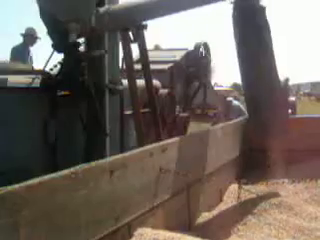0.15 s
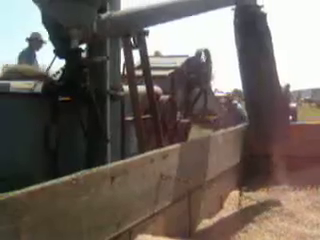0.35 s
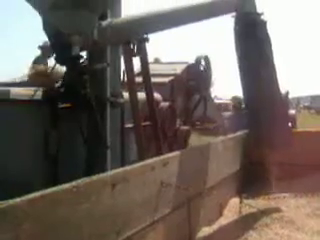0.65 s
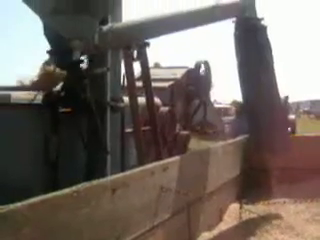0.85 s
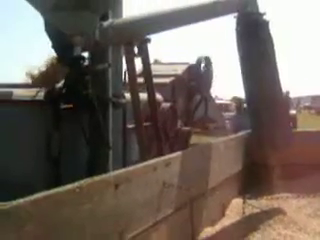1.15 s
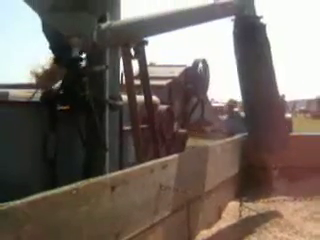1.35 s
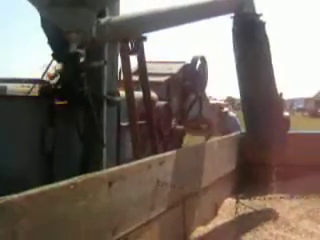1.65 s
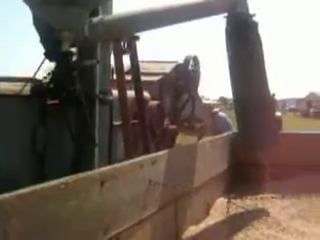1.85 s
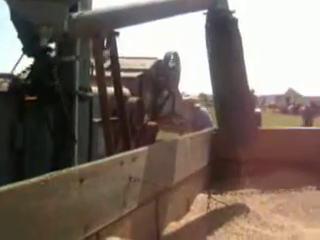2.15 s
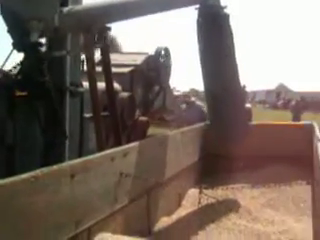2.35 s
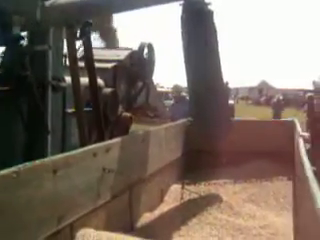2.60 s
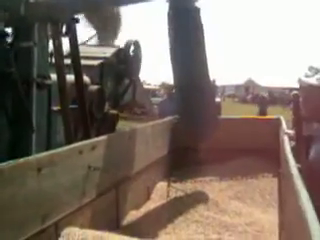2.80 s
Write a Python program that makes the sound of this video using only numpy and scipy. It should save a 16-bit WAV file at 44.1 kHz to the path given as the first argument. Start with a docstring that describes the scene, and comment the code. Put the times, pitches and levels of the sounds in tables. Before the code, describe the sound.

A threshing machine roars steadily with a low drone and quick metallic clatter.

```python
"""A roar over one low droning note sets in abruptly: a threshing machine in the open air.
The drum drones; drum, fan and straw roar through the wooden housing, whose panels hum.
Shaker and elevator clatter about ten times a second and loose grain rattles on sheet metal.
Heard close by through a narrow-band microphone."""
import sys
import numpy as np
from scipy import signal
from scipy.fft import rfft, irfft, next_fast_len
from scipy.io import wavfile

SR = 44100
rng = np.random.default_rng(int(sys.argv[2]) if len(sys.argv) > 2 else 0)


def inscribe(sig):
    """Save sig as 16-bit PCM at rate SR to the path in sys.argv[1].

    A 1-D sig is mono; a 2-D sig holds one channel per row.
    Samples are clipped to [-1, 1] before scaling.
    """
    pcm = np.round(np.clip(np.atleast_2d(sig).T, -1, 1) * 32767)
    wavfile.write(sys.argv[1], SR, pcm.astype(np.int16))


N = 130977

# roar in the housing: freq_hz, relative_density_db
ROAR_SPECTRUM = [(12, -43.5), (20, -23), (37, -18.5), (54, -5), (118, -6.5), (258, -6.5), (296, -5),
                 (338, -7), (378, -5.5), (484, -14), (593, -8.5), (709, -8.5), (971, -14.5), (1160, -22),
                 (1300, -21), (1630, -27), (1860, -25.5), (2230, -36), (2490, -32.5), (2790, -40),
                 (3340, -34), (3730, -42), (4270, -50), (5550, -92.5), (9390, -120)]
# slow swings of the roar: time_s, hum_gain_db, treble_gain_db
ROAR_SWINGS = [(.08, 4.5, 4.5), (.3, -2, -2), (.5, 1, 0), (.7, -0.5, -1), (.9, -0.5, -0.5),
               (1.1, 1.5, -0.5), (1.3, 0, -0.5), (1.5, 2.5, -1.5), (1.7, 0, 0), (1.9, 1, -1.5),
               (2.1, -3.5, 0), (2.3, -0.5, -1), (2.5, -1, -1), (2.7, -1.5, -0.5), (2.96, 1.5, -1.5)]
# drum drone: time_s, pitch_hz, level_db
DRUM_DRONE = [(.08, 50.26, -28.5), (.27, 51.5, -19.5), (.85, 50.4, -21.5), (1.15, 50.33, -24.5),
              (1.45, 50.46, -25.5), (1.68, 51.3, -19), (1.79, 51.5, -29.5), (1.95, 51.7, -22),
              (2.22, 51.4, -18.5), (2.41, 51.5, -25.5), (2.52, 51.6, -18), (2.66, 51.66, -26),
              (2.85, 51.8, -20.5), (2.96, 53.44, -22)]
# housing panels: freq_hz, stage_width_hz, level_db
PANEL_MODES = [(37, 9, -35), (65.4, 12, -33), (80.6, 15, -33), (295.1, 25, -30.5), (379.2, 26, -34),
               (459, 11, -37.5), (603.7, 35, -36), (702.4, 70, -34), (792.3, 32, -33), (974, 30, -43.5)]
# shaker knocks: start_s, gain_db, bright_gain_db
SHAKER_KNOCKS = [(0.3247, -26, 0), (0.3855, -30, 1), (0.603, -29, -2), (0.6799, -26.5, 1),
                 (0.8066, -27.5, 0), (0.8854, -27.5, -1), (0.9707, -28.5, -1), (1.04, -27, 0),
                 (1.274, -26, -0.5), (1.3074, -28, 0), (1.3849, -28, 0), (1.4247, -25.5, -1),
                 (1.5214, -24.5, 1), (1.6182, -27, -0.5), (1.6667, -29, 0), (1.739, -30, -0.5),
                 (1.839, -27, 0.5), (1.932, -28, 1), (1.9799, -26.5, 0.5), (2.1383, -24, -0.5),
                 (2.1994, -29.5, 0), (2.2268, -26, 0), (2.3255, -29.5, -2), (2.5362, -28, 0),
                 (2.6359, -27, -0.5), (2.6695, -29, -2), (2.725, -25, 0), (2.8214, -25.5, -0.5)]
# sheet metal: freq_hz, width_hz, relative_gain_db
SHEET_MODES = [(1250, 360, -1.5), (1790, 270, 0.5), (2390, 91, 0), (3010, 400, -4), (3700, 360, -8.5)]

ROAR_DB, HUM_BAND_HZ, TREBLE_HZ = -14.5, (250, 500), 900
SHARED_FLICKER_DB, SHARED_FLICKER_HZ, BAND_FLICKER_DB, BAND_FLICKER_HZ = 1.0, 27, 1.5, 14
PANEL_SWELL_DB, PANEL_SWELL_HZ = 1.5, 3
KNOCK_RISE_S, KNOCK_T60_S, BRIGHT_HZ = .004, .11, 2850
GRAIN_PER_S, GRAIN_SPREAD_DB, GRAIN_DB = 900, 4.5, -44.5
DC_OFFSET, LIMIT, NEGATIVE_LIMIT_RATIO, RELEASE_DB_PER_S = .017, .53, 1.1, 61.5
MIC_ROLLOFF_HZ, CUTOFF_HZ = 3723, 4420
START_S, FADE_IN_S = .0725, .0001


def housing_roar():
    """Drum, fan and straw: noise in half-octave bands that flicker partly together, partly alone."""
    size = next_fast_len(N)
    octave = np.log2(np.maximum(np.fft.rfftfreq(size, 1 / SR), 1))
    freq_hz, density_db = np.transpose(ROAR_SPECTRUM)
    spectrum = rfft(rng.standard_normal(size)) * amp(np.interp(octave, np.log2(freq_hz), density_db, -99))
    hum_db, treble_db = curves(ROAR_SWINGS)
    treble_db += SHARED_FLICKER_DB * drift(SHARED_FLICKER_HZ)
    roar = 0
    for centre_octave in np.arange(4, 13.1, .5):
        centre_hz = 2 ** centre_octave
        window = np.cos(np.pi * np.clip(octave - centre_octave, -.5, .5)) ** 2
        in_hum = HUM_BAND_HZ[0] < centre_hz < HUM_BAND_HZ[1]
        treble_share = 1 / (1 + (TREBLE_HZ / centre_hz) ** 2)
        gain_db = in_hum * hum_db + treble_share * treble_db + BAND_FLICKER_DB * drift(BAND_FLICKER_HZ)
        roar += amp(gain_db) * irfft(spectrum * window, size)[:N]
    return amp(ROAR_DB) * unit_rms(roar)


def drum_drone():
    """The drum drones on one low sine, wavering in pitch and level."""
    pitch_hz, level_db = curves(DRUM_DRONE)
    phase = 2 * np.pi * np.cumsum(pitch_hz) / SR + rng.uniform(0, 2 * np.pi)
    return np.sqrt(2) * amp(level_db) * np.sin(phase)


def panel_hum():
    """Each panel picks a narrow band out of the shaking and swells on its own."""
    shaking = rng.standard_normal(N)
    hum = 0
    for freq_hz, width_hz, level_db in PANEL_MODES:
        band = resonance(resonance(shaking, freq_hz, width_hz), freq_hz, width_hz)
        hum += amp(level_db + PANEL_SWELL_DB * drift(PANEL_SWELL_HZ)) * unit_rms(band)
    return hum


def shaker_clatter():
    """Each knock is a noise burst in the sheet metal that rises fast and dies; some ring brighter."""
    low_power, high_power = np.zeros((2, N))
    for start_s, gain_db, bright_gain_db in SHAKER_KNOCKS:
        age_s = np.maximum(np.arange(N) / SR - start_s, 0)
        envelope = amp(gain_db - 60 * age_s / KNOCK_T60_S) * (1 - np.exp(-age_s / KNOCK_RISE_S))
        low_power += envelope ** 2 / 2
        high_power += (envelope * amp(bright_gain_db)) ** 2 / 2
    ring = sheet_metal(rng.standard_normal(N))
    low = signal.sosfilt(signal.butter(4, BRIGHT_HZ, "low", fs=SR, output="sos"), ring)
    high = signal.sosfilt(signal.butter(4, BRIGHT_HZ, "high", fs=SR, output="sos"), ring)
    return np.sqrt(low_power) * low + np.sqrt(high_power) * high


def grain_rattle():
    """Kernels strike the sheet metal at random."""
    strengths = amp(GRAIN_SPREAD_DB * np.minimum(rng.exponential(1, N), 5)) * rng.choice([-1, 1], N)
    strikes = rng.random(N) < GRAIN_PER_S / SR
    return amp(GRAIN_DB) * unit_rms(sheet_metal(strengths * strikes + 1e-18))


def sheet_metal(force):
    """Broad parallel resonances of alternating sign; white input keeps its rms."""
    def ring(x):
        return sum((-1) ** k * amp(gain_db) * resonance(x, freq_hz, width_hz)
                   for k, (freq_hz, width_hz, gain_db) in enumerate(SHEET_MODES))
    return ring(force) / np.linalg.norm(ring(signal.unit_impulse(4096)))


def resonance(x, freq_hz, width_hz):
    """Two-pole band-pass, peak gain 1."""
    radius = np.exp(-np.pi * width_hz / SR)
    feedback = [1, -2 * radius * np.cos(2 * np.pi * freq_hz / SR), radius ** 2]
    return signal.lfilter((1 - radius ** 2) / 2 * np.array([1, 0, -1]), feedback, x)


def drift(corner_hz):
    """Slow random curve, rms 1."""
    hop, warmup = 40, 2000
    pole = np.exp(-2 * np.pi * corner_hz * hop / SR)
    noise = rng.standard_normal(N // hop + warmup + 2)
    slow = signal.lfilter([1], [1, -2 * pole, pole ** 2], noise)[warmup:]
    return np.interp(np.arange(N) / hop, np.arange(len(slow)), unit_rms(slow))


def curves(rows):
    """Table columns interpolated per sample."""
    time_s, *columns = np.transpose(rows)
    return [np.interp(np.arange(N) / SR, time_s, column) for column in columns]


def amp(db):
    """dB to gain."""
    return 10 ** (np.asarray(db) / 20)


def unit_rms(x):
    """Scale to rms 1."""
    return x / np.sqrt(np.mean(x ** 2) + 1e-20)


def scene():
    """The whole machine, mono."""
    return (drum_drone() + housing_roar() + panel_hum() + shaker_clatter() + grain_rattle())[None]


def record(dry):
    """DC offset, limiter, treble roll-off and cut, abrupt start."""
    time_s = np.arange(N) / SR
    biased = dry + DC_OFFSET
    peak = np.maximum(biased, -biased / NEGATIVE_LIMIT_RATIO)
    over_db = 20 * np.log10(np.maximum(peak / LIMIT, 1))
    release_db = RELEASE_DB_PER_S * time_s
    reduction_db = np.maximum.accumulate(over_db + release_db, axis=1) - release_db
    limited = biased * amp(-reduction_db)
    rolled = signal.sosfilt(signal.cheby1(4, 1, MIC_ROLLOFF_HZ, fs=SR, output="sos"), limited)
    narrow = signal.sosfilt(signal.ellip(9, .3, 70, CUTOFF_HZ, fs=SR, output="sos"), rolled)
    return narrow * np.clip((time_s - START_S) / FADE_IN_S, 0, 1)


dry = scene()
out = record(dry)
inscribe(out)
```